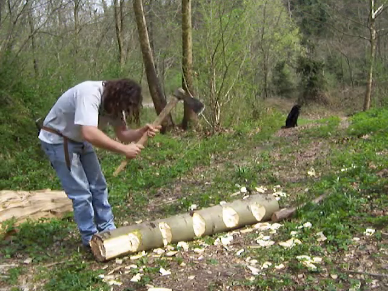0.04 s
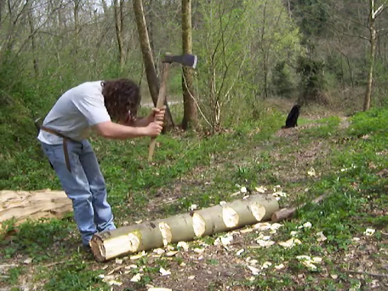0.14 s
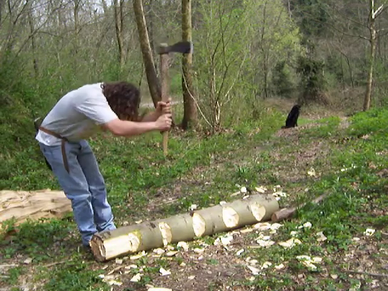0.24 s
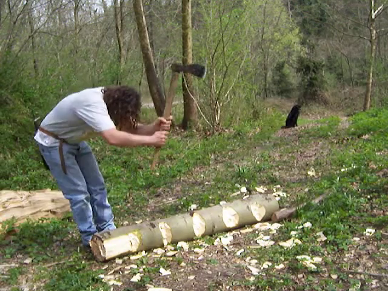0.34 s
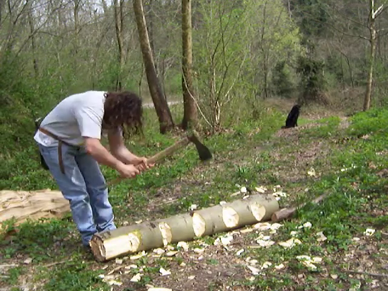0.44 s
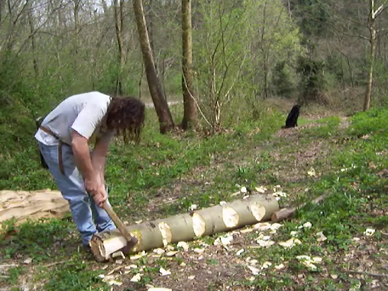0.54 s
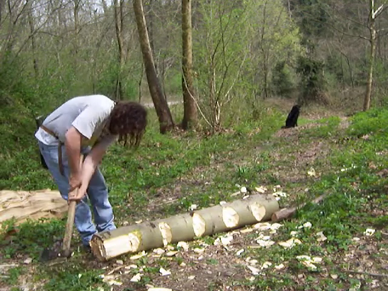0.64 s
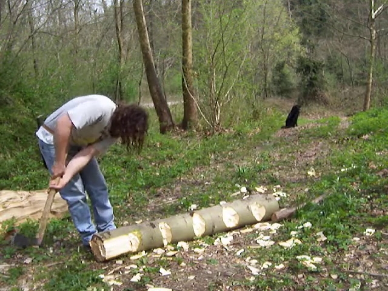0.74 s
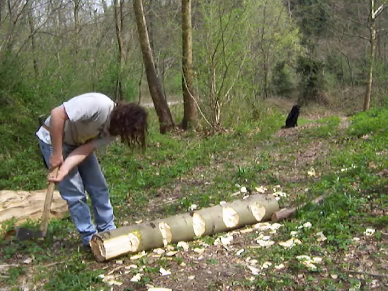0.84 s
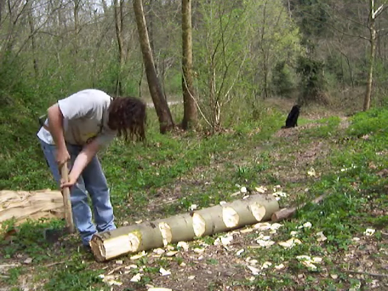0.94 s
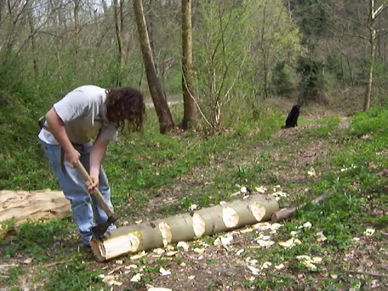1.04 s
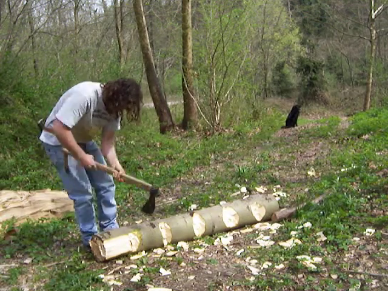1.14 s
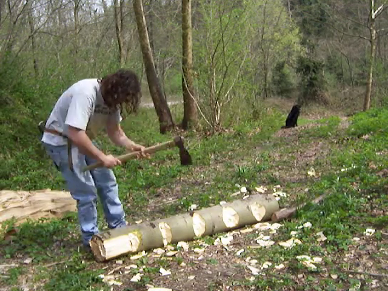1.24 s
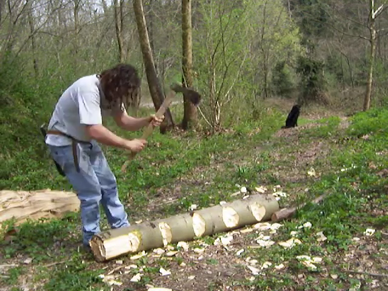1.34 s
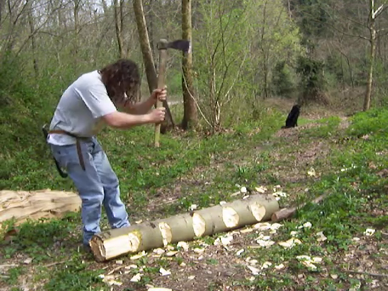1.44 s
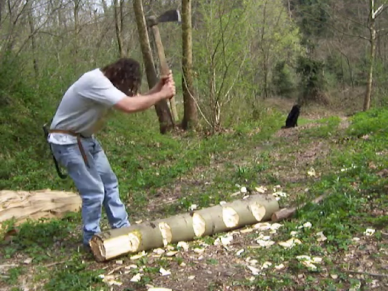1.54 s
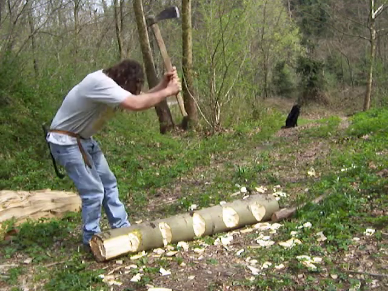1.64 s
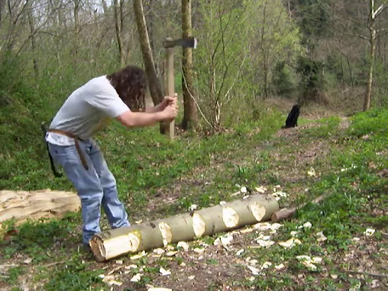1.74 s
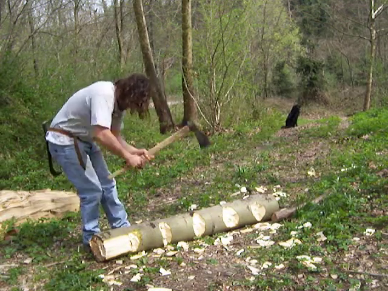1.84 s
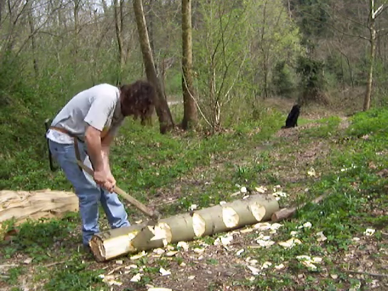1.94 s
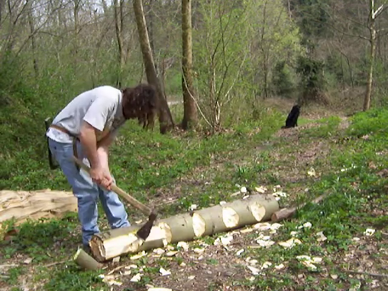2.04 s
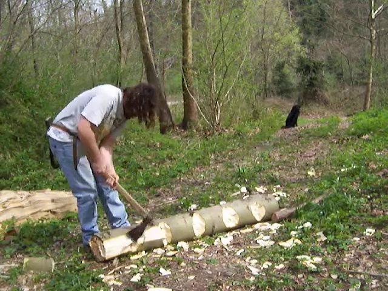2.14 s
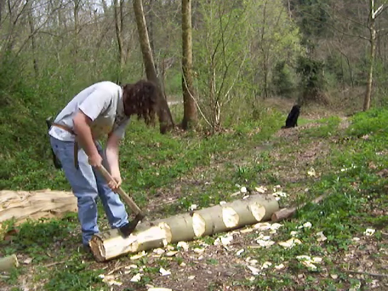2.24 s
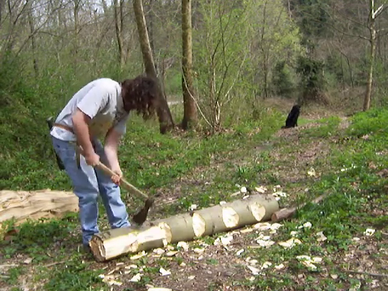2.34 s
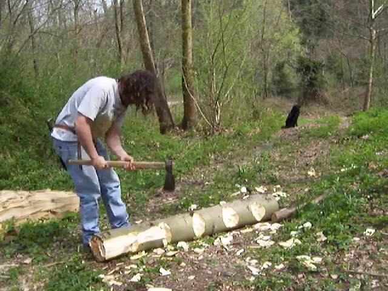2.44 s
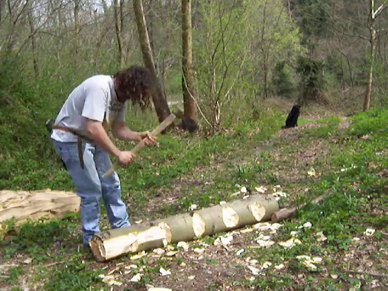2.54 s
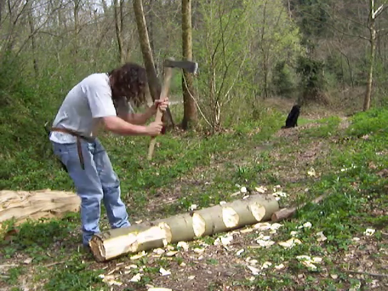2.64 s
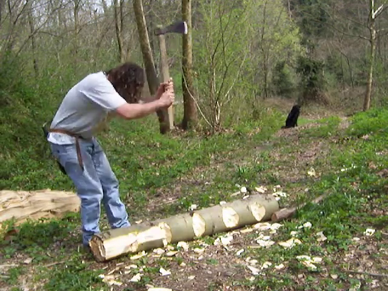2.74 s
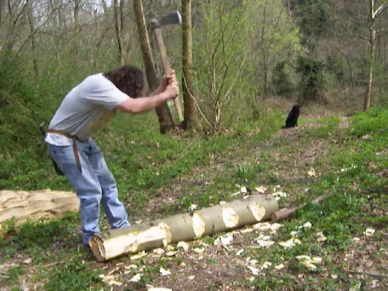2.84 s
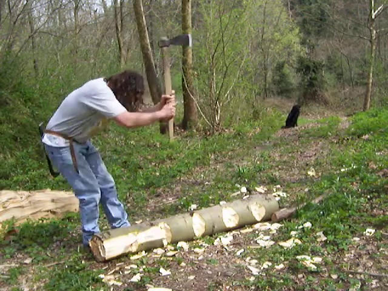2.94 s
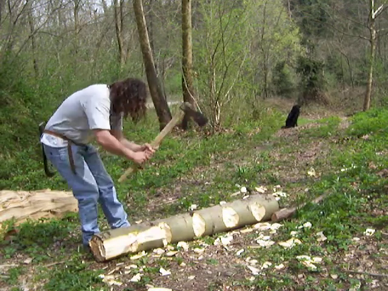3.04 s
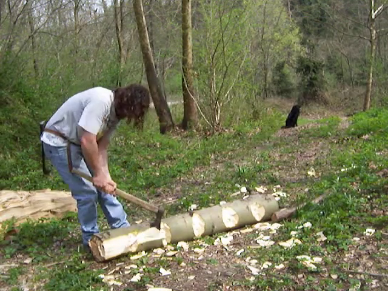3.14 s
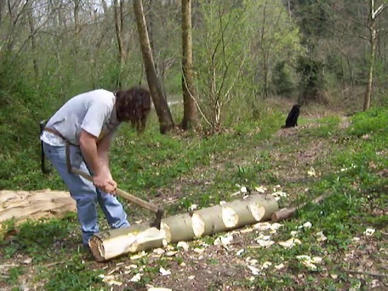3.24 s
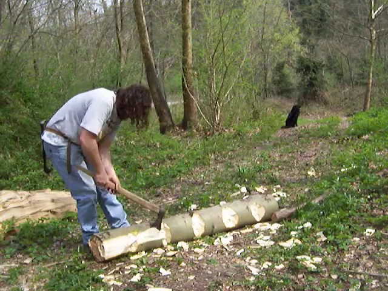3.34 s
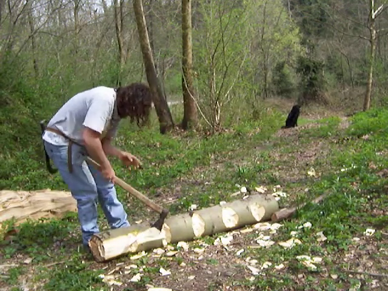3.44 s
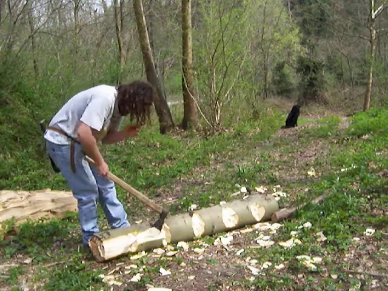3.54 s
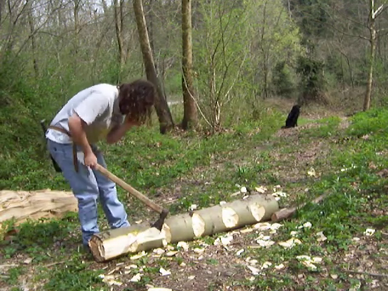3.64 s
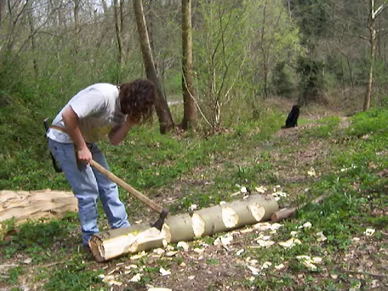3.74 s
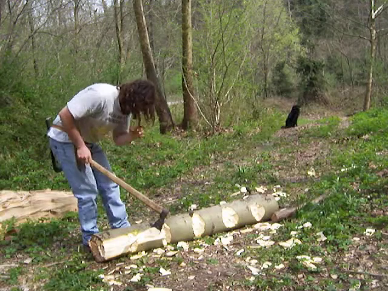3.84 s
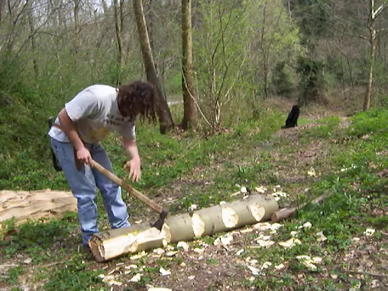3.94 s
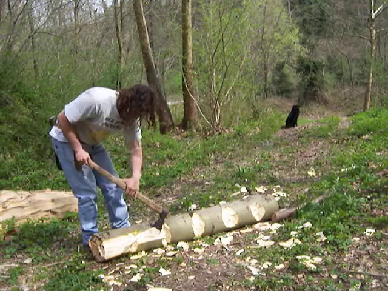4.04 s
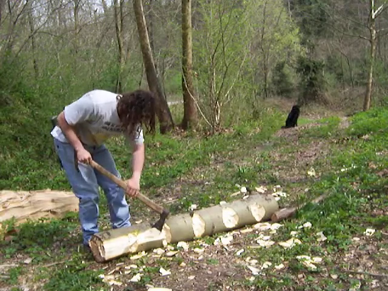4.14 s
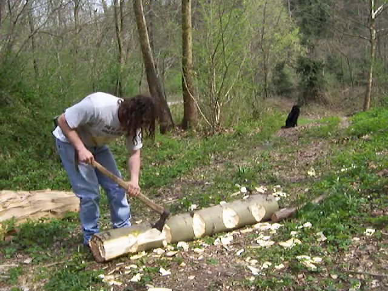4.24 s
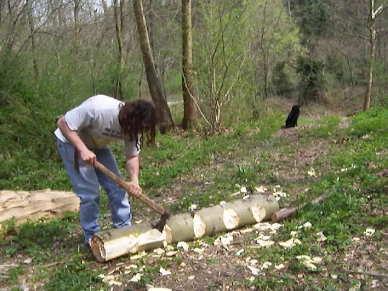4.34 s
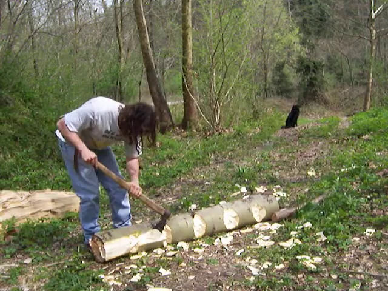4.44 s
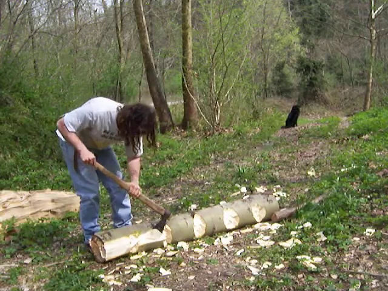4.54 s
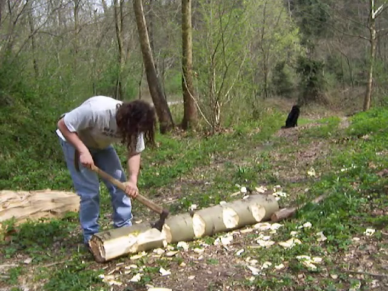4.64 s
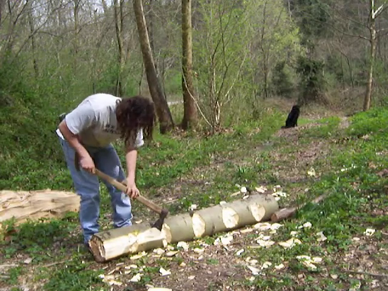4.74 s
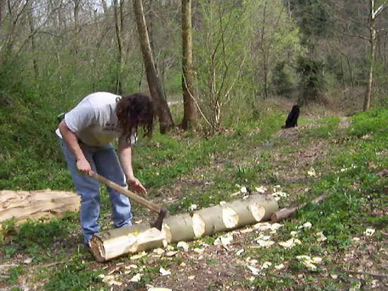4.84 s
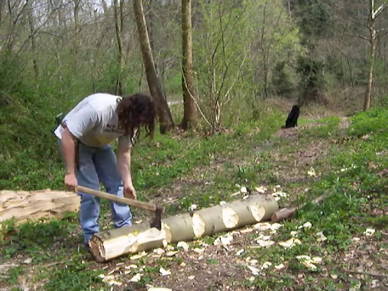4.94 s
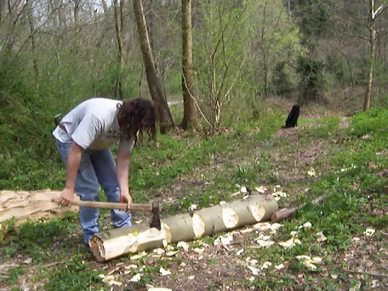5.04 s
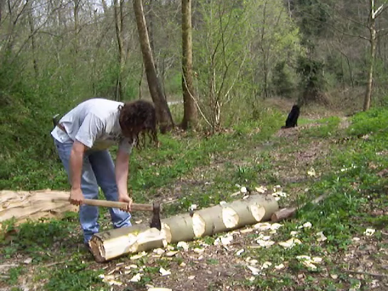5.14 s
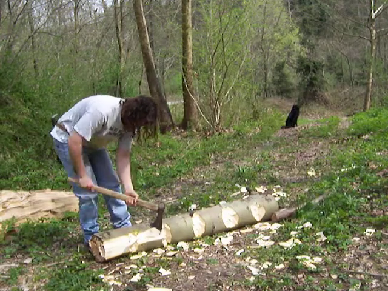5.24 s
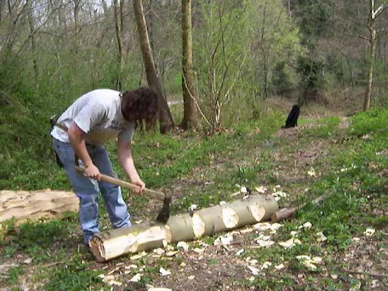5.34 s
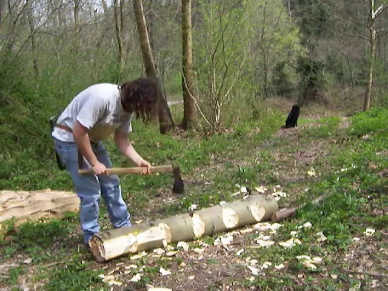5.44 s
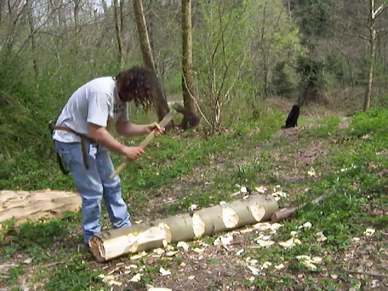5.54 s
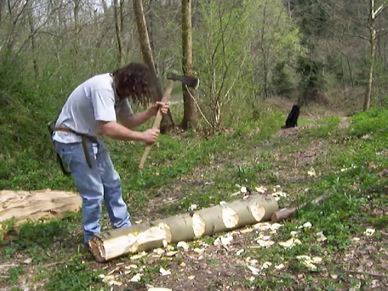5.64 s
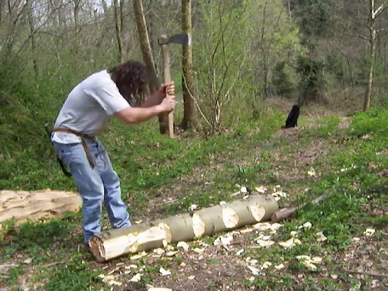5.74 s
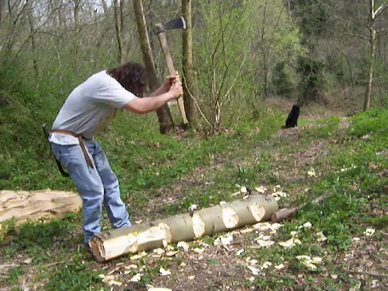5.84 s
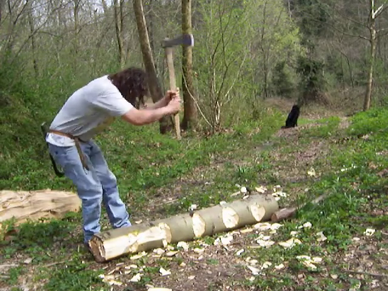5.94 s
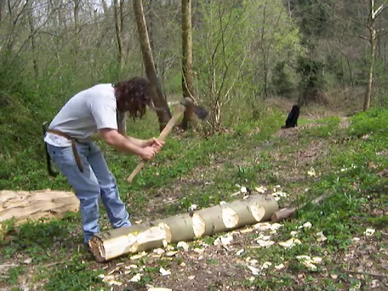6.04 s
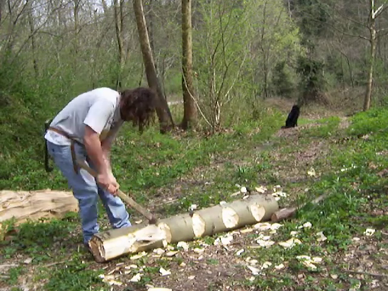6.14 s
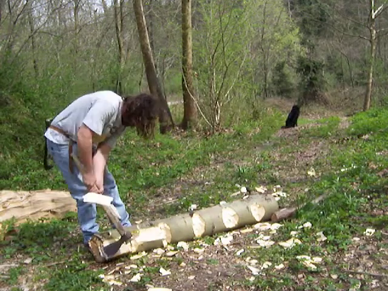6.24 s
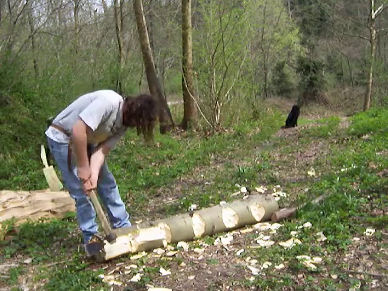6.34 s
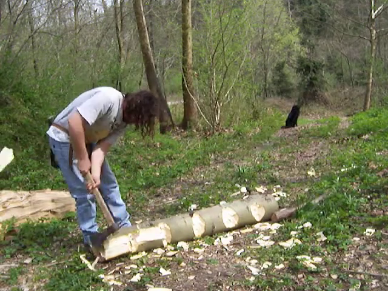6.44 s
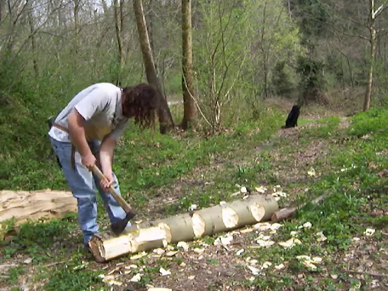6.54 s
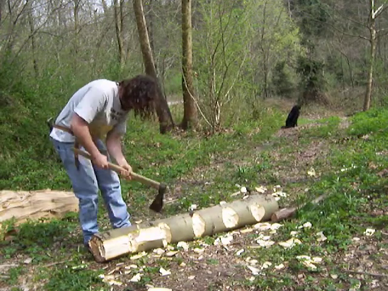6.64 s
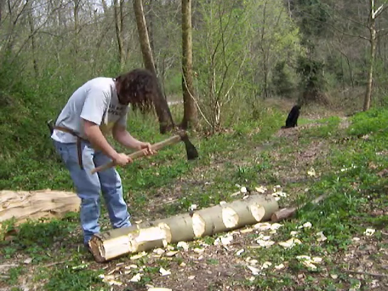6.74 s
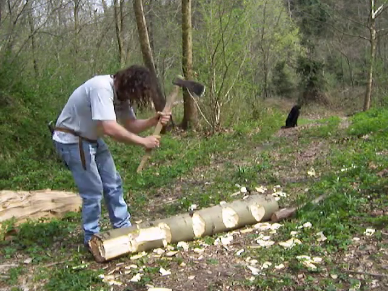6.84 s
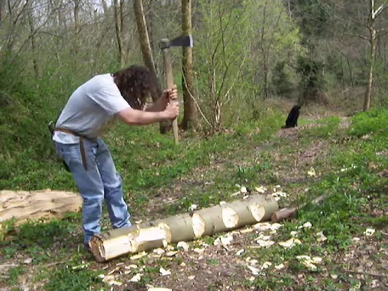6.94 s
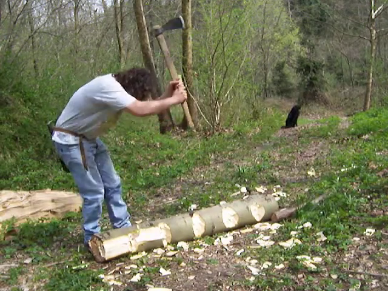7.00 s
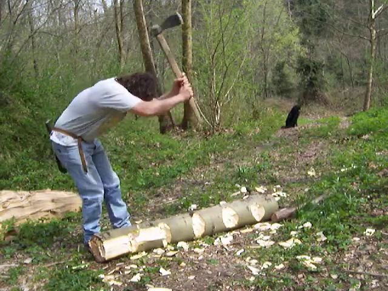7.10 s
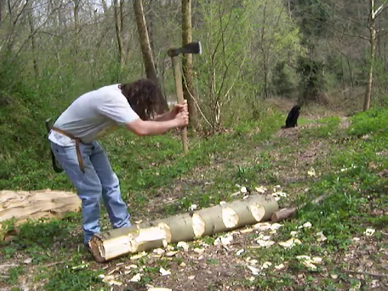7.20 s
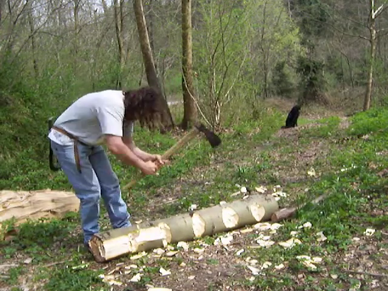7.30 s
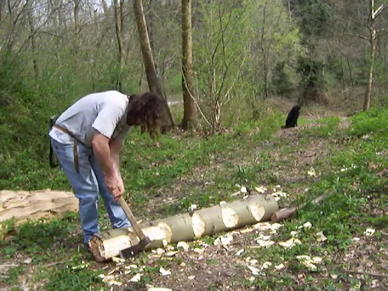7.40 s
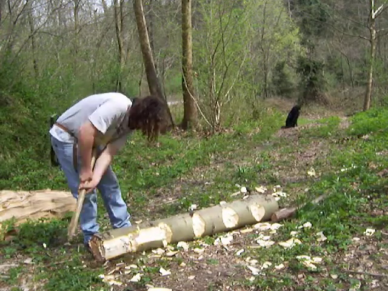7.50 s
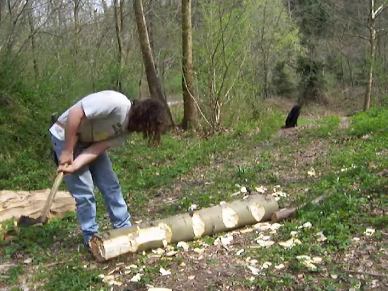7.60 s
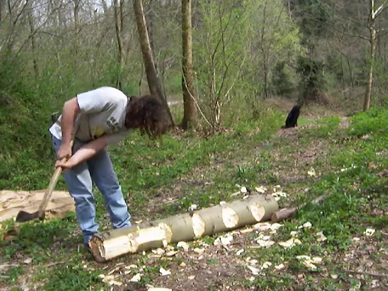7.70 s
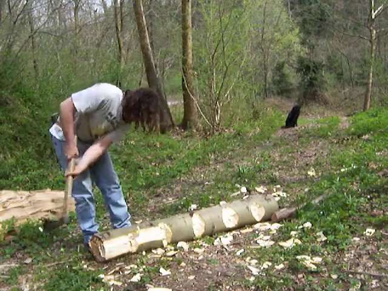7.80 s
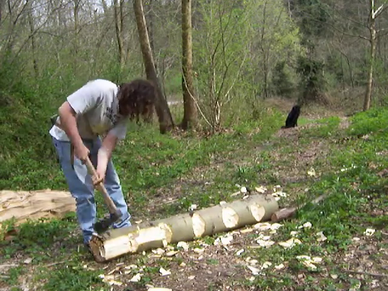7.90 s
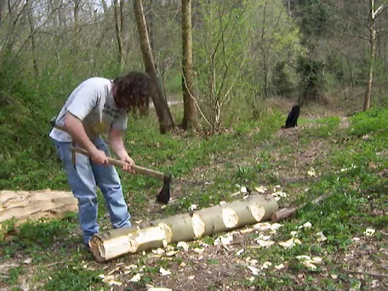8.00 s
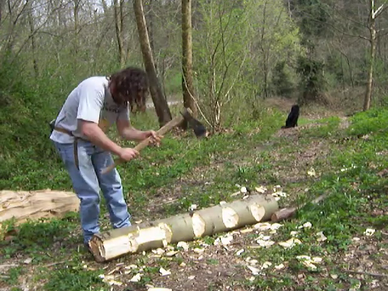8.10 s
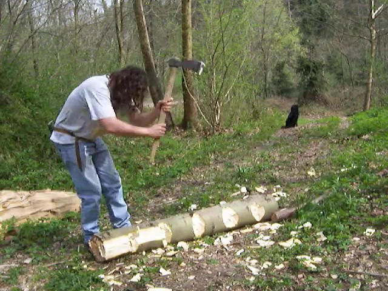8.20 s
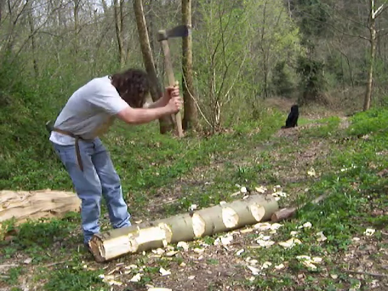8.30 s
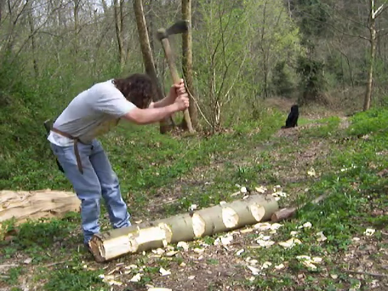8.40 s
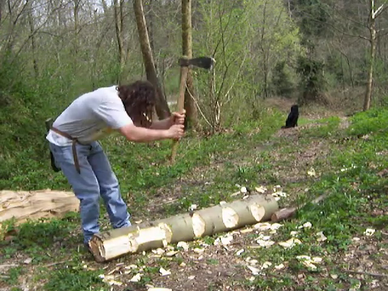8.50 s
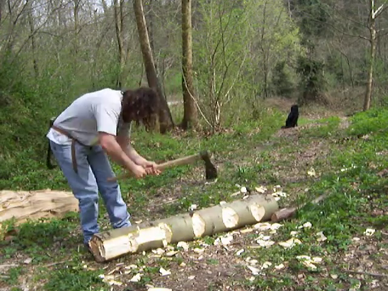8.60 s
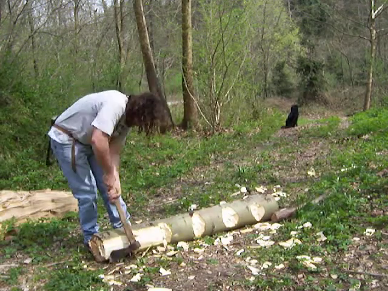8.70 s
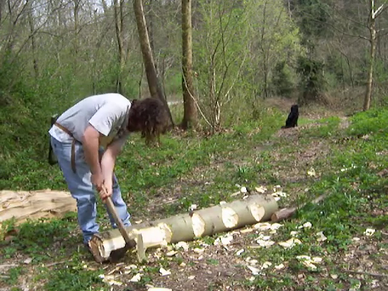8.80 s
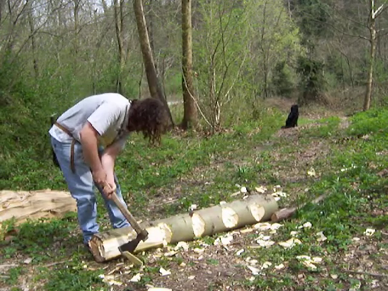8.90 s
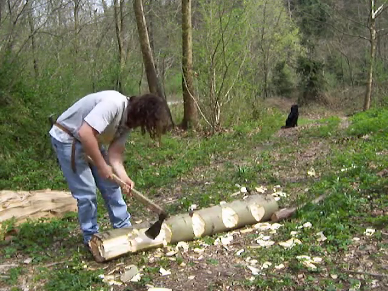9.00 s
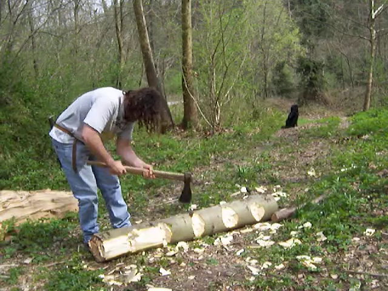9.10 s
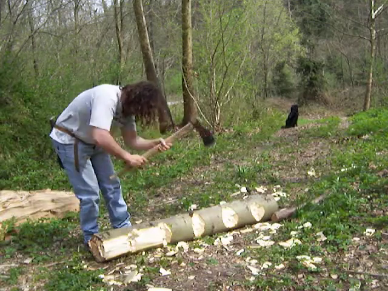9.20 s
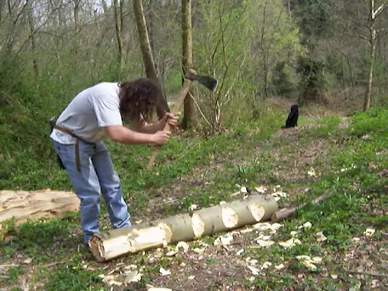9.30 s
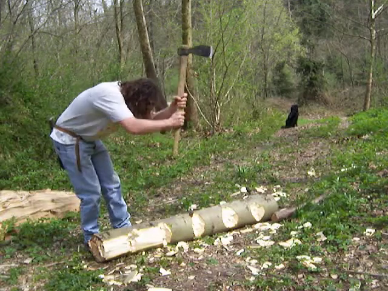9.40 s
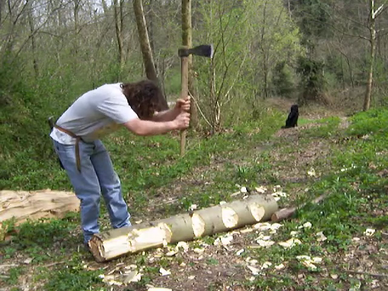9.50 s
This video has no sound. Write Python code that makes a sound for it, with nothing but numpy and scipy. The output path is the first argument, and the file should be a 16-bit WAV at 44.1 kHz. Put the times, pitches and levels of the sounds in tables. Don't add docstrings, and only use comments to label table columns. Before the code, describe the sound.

In a quiet wood, an axe strikes a green log with crisp, splitting cracks and short hollow thuds. Three blows come a little over a second apart, then a pause of about three seconds, a hardest blow, and two more. Trees return a short diffuse reverberation. Small chips tick into the litter. Far birds whistle early on above faint leaf hiss, low wind rumble and a weak motor hum. The small microphone sounds slightly dull on top.

```python
import sys
import numpy as np
from scipy import signal
from scipy.io import wavfile
from scipy.ndimage import uniform_filter1d

SR = 44100
rng = np.random.default_rng(int(sys.argv[2]) if len(sys.argv) > 2 else 0)


def volts(x):
    e = np.asarray(x, float) / 20
    return 10 ** e


def output_pcm(signal):
    pcm = np.clip(np.atleast_2d(signal).T, -1, 1) * 32767
    wavfile.write(sys.argv[1], SR, np.round(pcm).astype(np.int16))


N = 421596

# (time [s], peak level [dB], brightest pitch
# [Hz], dull part [dB])
FIBRE_CRACKS = [(0.5886, -19, 3950, 4), (0.5909, -8, 5700, 3), (0.5977, -13.5, 3780, 5.5),
                (0.605, -26, 3570, 8), (0.614, -32, 6100, -16), (0.6288, -22, 5090, -11),
                (1.9601, -8.5, 2600, 9), (1.9654, -14.5, 2970, -13.5), (1.9753, -15.5, 2670, -10.5),
                (1.9858, -55, 2520, -28), (3.1783, -9.5, 3240, 6.5), (3.1827, -18.5, 2100, -3),
                (3.1886, -33, 2300, 19), (7.4288, -24, 2500, -5), (7.4342, -19.5, 996, -4.5),
                (7.4408, -8.5, 3590, -9.5), (7.4418, -7, 1556, -1.5), (7.4489, -19, 2530, 4.5),
                (7.4553, -29.5, 2390, -11.5), (8.7079, -11, 5020, -9), (8.7156, -17.5, 4160, 16.5),
                (8.7244, -14, 2480, -16), (8.7314, -20.5, 2210, -6), (8.7384, -16, 1095, 8.5),
                (8.7598, -22.5, 4140, 8), (8.768, -21, 5200, -27), (8.7724, -27, 4150, 8),
                (8.8164, -42.5, 4790, -3), (8.8644, -43.5, 5820, 1),
                (6.186, -10.5, 4030, 0.5),
    (6.1888, -12.5, 1470, 6.5),
    (6.1919, -6, 1150, -11),
    (6.1943, -11, 2520, 0),
    (6.198, -27, 2380, 2),
    (6.2069, -29, 5570, -5),
    (6.2375, -27.5, 3560, 18),
    (6.275, -54, 1690, 4),
]
# (time [s], peak level [dB], brightest pitch [Hz], dull part [dB])
CHIP_LANDINGS = [(0.966, -56.5, 2980, 0.5), (1.034, -57.5, 2840, -4), (1.316, -56, 1100, 1),
                 (2.059, -49.5, 2300, -26), (2.136, -56.5, 3570, -20), (2.491, -45.5, 3140, 2),
                 (2.689, -59, 2000, -12), (2.782, -42.5, 697, 4.5), (2.791, -42.5, 2800, 3),
                 (2.844, -52, 2010, -1), (2.854, -49.5, 1200, 4), (2.878, -55, 2500, -8),
                 (4.735, -45.5, 2670, -1), (4.991, -58.5, 1150, -17), (5.309, -62, 1220, -17.5),
                 (5.352, -58.5, 4950, 0.5), (7.005, -49, 1430, -4), (7.024, -52.5, 2300, -3),
                 (7.672, -51, 1790, -7), (7.678, -53, 3120, -13), (7.686, -47.5, 2000, 0),
                 (7.694, -50, 4800, 2), (7.699, -49, 5500, -15.5), (7.758, -54.5, 2500, 0),
                 (8.046, -57.5, 2970, -3), (8.069, -56, 2010, 1.5), (9.037, -59, 2840, 6),
                 (9.081, -36.5, 2360, -4), (9.086, -59, 1470, -13), (9.129, -69, 1200, 2)]
# (time [s], thud [dB], first mode [dB], second mode [dB], third mode [dB])
PUSHES = [(.589, -9, -35, -23.5, -33.5), (.604, -34.5, -21, -48, -25), (.634, -25, -20, -16, -22),
          (1.961, -16, -24, -15.5, -28.5), (3.180, -18.5, -27.5, -17.5, -30), (3.190, -42.5, -50, -26, -17),
          (4.055, -58, -80, -52, -66), (6.188, -14, -29.5, -32, -23), (6.193, -30, -43.5, -22, -37.5),
          (6.200, -24, -32, -20.5, -46), (6.240, -47, -37.5, -34, -46), (7.430, -35, -25.5, -17, -39.5),
          (7.442, -17.5, -17.5, -11, -36), (8.719, -23.5, -47, -26.5, -39), (8.726, -24, -16.5, -20.5, -53),
          (8.739, -21, -30, -28, -55), (8.776, -26, -35.5, -37.5, -31)]
# (frequency [Hz], t60 [s])
LOG_MODES = [(207, 0.35), (465, 0.16), (745, 0.11), (1010, 0.1)]
# (frequency [Hz], level re thud [dB], t60 [s])
SHORT_MODES = [(297, -16.5, 0.11), (577, -9.5, 0.0095), (823, -25, 0.12), (1209, -16.5, 0.033),
               (1580, -12, 0.016), (2206, -7.5, 0.02)]
# (band centre [Hz], t60 [s], level [dB])
SCATTER = [(313.8, 0.71, -24.5), (590, 0.33, -21), (837, 0.66, -23.5), (1320, 0.59, -22), (1750, .5, -21.5),
           (2300, 0.54, -20.5), (3340, 0.61, -24.5), (4670, .35, -24), (7304, 0.51, -22.5)]
# (delay [s], spread [s], level [dB])
EDGE_ECHOES = [
    (0.124, 0.023, -31.5),
    (0.201, 0.02, -32),
    (0.359, 0.034, -39),
    (0.502, 0.06, -38.5),
    (.622, .03, -33.5),
    (0.781, 0.03, -41.5),
]
# (time [s], rise [s], t60 [s], low [Hz], high [Hz], level [dB])
HOLLOW = (6.215, .05, .8, 1150, 1500, -53)
# (time [s], length [s], start [Hz], end [Hz], level [dB])
BIRD_NOTES = [(.04, .18, 5500, 5450, -80), (.05, .2, 3450, 3430, -74), (.3, .2, 3050, 2960, -77),
              (.4, .12, 7700, 7680, -76), (.47, .11, 3500, 3480, -74), (.72, .14, 3200, 3120, -73),
              (.9, .055, 3030, 3030, -69), (.975, .17, 3030, 3025, -69), (1.07, .14, 2730, 2680, -72),
              (1.16, .11, 3620, 3610, -68), (1.15, .25, 3400, 3350, -76), (1.38, .14, 2700, 2780, -75),
              (1.46, .18, 3830, 3900, -71), (1.715, .06, 2750, 2750, -69), (1.68, .14, 2270, 2200, -73),
              (1.8, .15, 3650, 3740, -68), (1.83, .12, 2110, 2080, -68), (1.885, .06, 2440, 2450, -73),
              (2.1, .17, 3600, 3680, -74), (2.99, .1, 2400, 2360, -74), (3.06, .11, 2200, 2130, -72),
              (3.3, .12, 2300, 2400, -79), (4.4, .15, 2650, 2550, -78), (5.33, .15, 2650, 2580, -79)]
# (first [s], last [s], rate [1/s], start [Hz], end [Hz], level [dB])
TWITTER = (.95, 1.9, 12, 4700, 5800, -80)
# (time [s], background level [dB])
BACKGROUND_LEVEL = [(0, -60.5), (.5, -62), (.9, -59), (1.5, -59.5), (2.3, -61.5), (3.4, -60), (4.2, -61.5),
                    (5.8, -61.5), (6.1, -62.5), (6.4, -64.5), (7.0, -63.5), (7.4, -65), (7.7, -62), (8.4, -64),
                    (8.9, -62), (9.56, -61.5)]
# (frequency [Hz], density [dB per Hz])
HISS_SPECTRUM = [(47, -35.5), (80, -5.5), (124, -3.5), (148, -21), (183, -8), (207, -9.5), (389, -11.5),
                 (464, -7.5), (513, -13.5), (1320, -21), (6430, -26.5), (7680, -16), (9000, -44.5),
                 (11700, -89), (19800, -120)]
# (start [s], length [s], level [dB])
GUSTS = [(0.004, 0.05, -39), (0.6, 0.046, -41), (1.326, 0.195, -45), (1.882, 0.064, -38), (2.02, 0.06, -37),
         (2.277, 0.158, -38), (2.496, 0.044, -44), (2.616, 0.042, -39.5), (3.245, 0.094, -47.5),
         (3.58, 0.052, -38), (4.665, 0.054, -36.5), (6.843, 0.062, -40.5)]
# (order [multiples of its rotation], level [dB rms])
MOTOR_ORDERS = [(2, -56.5), (3, -71), (4, -66), (5, -70), (6, -67.5), (7, -73), (8, -70.5), (9, -80.5),
                (10, -74.5), (12, -78)]


def rms_one(x):
    return x / np.sqrt(np.mean(x ** 2) + 1e-20)


def band(x, low_hz, high_hz):
    return signal.sosfilt(signal.butter(2, [low_hz, high_hz], "band", fs=SR, output="sos"), x)


def drift(rate):
    hop = 40
    pole = np.exp(-2 * np.pi * rate * hop / SR)
    noise = rng.standard_normal(N // hop + 2002)
    slow = signal.lfilter([1], [1, -2 * pole, pole * pole], noise)[2000:]
    return np.interp(np.arange(N) / hop, np.arange(len(slow)), rms_one(slow))


def ring(clicks, hz, t60):
    r, w = volts(-60 / (t60 * SR)), 2 * np.pi * hz / SR
    return signal.lfilter([0, np.sin(w)], [1, -2 * r * np.cos(w), r * r], clicks + 1e-18)


def snaps(events, low_hz, top_hz, t60_s, quicker, at_db):
    out, t = np.zeros(N), np.arange(SR // 11) / SR
    white = rng.standard_normal((len(events), len(t)))
    sizes = rng.exponential(1, (len(events), len(t)))
    for k, (s, peak_db, hz, dull_db) in enumerate(events):
        dies = np.clip(t60_s * 2 ** (quicker * (at_db - peak_db) / 10), .004, .12)
        grains = white[k] * volts(5 * np.minimum(sizes[k], 4))
        shower = rms_one(band(grains, 2200, top_hz))
        shower += 1.1 * rms_one(band(grains, hz / 1.41, hz * 1.284))
        shower += volts(min(dull_db, 8)) * rms_one(band(grains, low_hz, 1200))
        shower *= volts(-60 * t / dies) * np.minimum(t / 0.00068, 1)
        i = round(s * SR)
        out[i:i + len(t)] += (volts(peak_db) * shower / np.abs(shower).max())[:N - i]
    return out


def fibre_cracks():
    return snaps(FIBRE_CRACKS, 500, 7000, t60_s=0.022, quicker=.4, at_db=-15)


def log():
    pushes = np.array(PUSHES)
    at = np.round(pushes[:, 0] * SR).astype(int)
    thud_db, third_db = pushes[:, 1], pushes[:, 4]
    uneven_db, out = rng.normal(0, 1, (len(pushes), len(SHORT_MODES))), np.zeros(N)
    fourth_db = -8.5 + 0.47 * thud_db + 0.53 * third_db
    bending_db = [*pushes[:, 2:5].T, fourth_db]
    modes = [(hz, t60, db) for (hz, t60), db in zip(LOG_MODES, bending_db)]
    modes += [(hz, t60, thud_db + db + uneven_db[:, k]) for k, (hz, db, t60) in enumerate(SHORT_MODES)]
    modes += [(121.0, 0.031, thud_db - 9)]
    for k, (hz, t60, levels_db) in enumerate(modes):
        clicks = np.zeros(N)
        clicks[at] = volts(levels_db) * (-1) ** k
        out += ring(clicks, hz, t60)
    return uniform_filter1d(out, size=9, origin=4)


def chip_landings():
    return snaps(CHIP_LANDINGS, 400, 7600, t60_s=0.035, quicker=0.25, at_db=-45)


def trees(x):
    out, white, late = 0, rng.standard_normal((2, N)), round(0.0051 * SR)
    near = volts(-120 / (.11 * SR))
    for k, (hz, t60, db) in enumerate(SCATTER):
        far = volts(-120 / (t60 * SR))
        power = band(x, hz / 1.106, hz * 1.116) ** 2 + 1e-18
        slow = signal.lfilter([1 - far], [1, -far], power)
        fast = signal.lfilter([1 - near], [1, -near], slow * 0 + power)
        returned = np.r_[np.zeros(late), (slow + volts(7.0) * fast)[:-late]]
        wash = rms_one(band(white[k % 2], hz / 1.57, hz * 1.495))
        out = out + volts(db + 7) * np.sqrt(returned) * wash
    return out * volts(1.2 * drift(45))


def echoes(x):
    t = np.arange(SR) / SR
    shape = sum(volts(db) * np.exp(-.5 * ((t - delay) / spread) ** 2) / (spread * SR)
                for delay, spread, db in EDGE_ECHOES)
    trunks = np.cos(2 * np.pi * 461 * t) + 3 * rng.standard_normal(SR)
    return band(signal.fftconvolve(x, shape * trunks)[:N], 420, 520)


def hollow():
    s, rise, t60, low_hz, high_hz, db = HOLLOW
    t = np.maximum(np.arange(N) / SR - s, 0)
    level = volts(db - 60 * t / t60 + 3 * drift(25)) * np.minimum(t / rise, 1)
    return level * rms_one(band(rng.standard_normal(N), low_hz, high_hz))


def twitter():
    first, last, per_s, from_hz, to_hz, chirp_db = TWITTER
    chance = rng.normal(0, 1, (40, 3))
    return [(s + .015 * a, .025, from_hz + 250 * b, to_hz + 250 * b, chirp_db + 3 * c)
            for s, (a, b, c) in zip(np.arange(first, last, 1 / per_s), chance)]


def birds():
    out, hang = np.zeros(N), np.arange(SR // 4) / SR
    flutter = volts(3 * drift(40))
    waver = 1 + .004 * drift(25) + .011 * drift(120)
    for s, length, start_hz, end_hz, db in BIRD_NOTES + twitter():
        i, n = round(s * SR), round(length * SR)
        hz = np.r_[np.linspace(start_hz, end_hz, n), end_hz + 0 * hang]
        echo_db = -5 + 10 * np.log10(min(length / .15, 1))
        shape = np.r_[np.sin(np.linspace(0, 2.6, n)) ** .4, volts(echo_db - 60 * hang / .9)]
        phase = 2 * np.pi * np.cumsum(hz * waver[i:i + len(hz)]) / SR
        out[i:i + len(hz)] += volts(db + 3.0) * shape * np.sin(phase)
    return out * flutter


def leaves():
    patchy_db = -0.37
    out, together, edges = 0, drift(2.5), 70 * 2 ** np.arange(0, 7.2, 1 / 3)
    white, (table_hz, table_db) = rng.standard_normal((2, N)), np.transpose(HISS_SPECTRUM)
    for k, (low, high) in enumerate(zip(edges, edges[1:])):
        level_db = np.interp(np.log(low * high) / 2, np.log(table_hz), table_db)
        flicker_db = patchy_db * (together + 0.4 * drift(23))
        out = out + volts(level_db + flicker_db) * band(white[k % 2], low, high)
    return out / np.std(band(out, 230, 7000))


def wind(hiss_db):
    usual_db, t = hiss_db.mean(), np.arange(N) / SR
    level_db = usual_db + 7 + 0.69 * (hiss_db - usual_db)
    puffs = sum(volts(db - 1.5) * np.exp(-.5 * ((t - s - length / 2) / (0.31 * length)) ** 2)
                for s, length, db in GUSTS)
    deep = np.hypot(volts(level_db + 2 * drift(10)), puffs)
    upper = volts(level_db - 4.5 + 2.2 * drift(4.0))
    rumble = deep * rms_one(band(rng.standard_normal(N), 12, 31))
    return rumble + upper * rms_one(band(rng.standard_normal(N), 30, 80))


def motor():
    turns = 29.97 * np.arange(N) / SR
    return sum(volts(db - 2.0 + 2.5 * drift(.6)) * np.sin(2 * np.pi * (order * turns + rng.random()))
               for order, db in MOTOR_ORDERS)


def scene():
    hiss_db = np.interp(np.arange(N) / SR, *np.transpose(BACKGROUND_LEVEL))
    blows = volts(0.5) * fibre_cracks() + log() + volts(7.0) * chip_landings()
    returns = trees(blows) + echoes(blows) + hollow()
    hum = volts(1.4 * (hiss_db - hiss_db.mean())) * motor()
    wood = volts(hiss_db - 3.5) * leaves() + wind(hiss_db) + hum
    return (blows + returns + birds() + wood)[None]


def roll_off(x):
    return signal.sosfilt(signal.butter(12, 9380, fs=SR, output="sos"), x)


def record(dry):
    notch_hz, notch_width_hz, top_hz = 6810, 130, 6910
    x = signal.lfilter(*signal.iirnotch(notch_hz, notch_hz / notch_width_hz, fs=SR), dry)
    x = signal.sosfilt(signal.butter(6, top_hz, fs=SR, output="sos"), x)
    x = signal.sosfilt(signal.cheby2(12, 80, 10300, fs=SR, output="sos"), x)
    return roll_off(x)


dry = scene()
out = record(dry)
output_pcm(out)
```